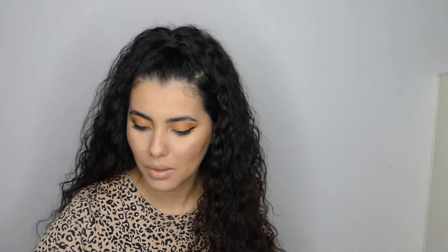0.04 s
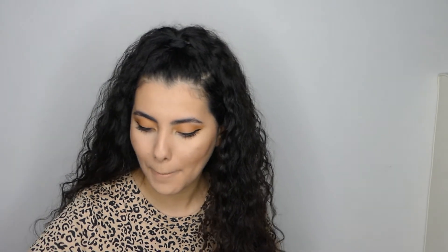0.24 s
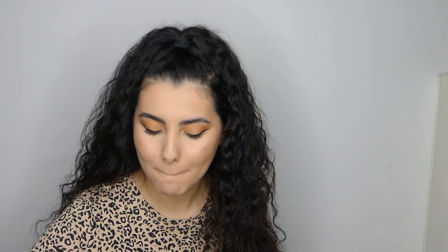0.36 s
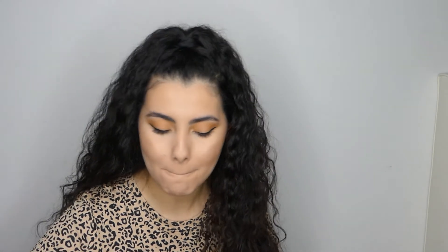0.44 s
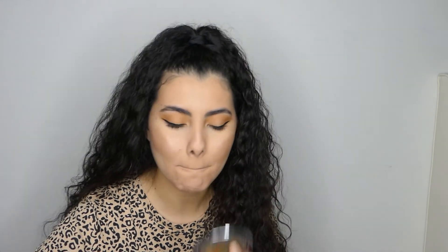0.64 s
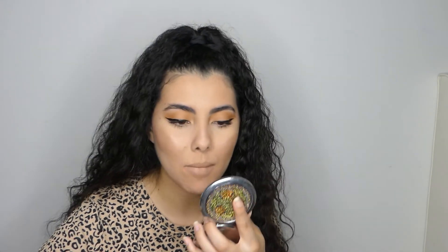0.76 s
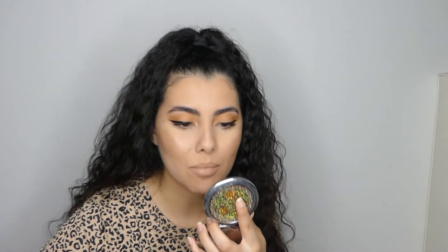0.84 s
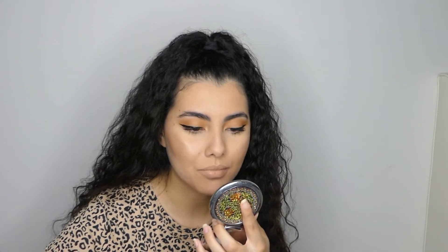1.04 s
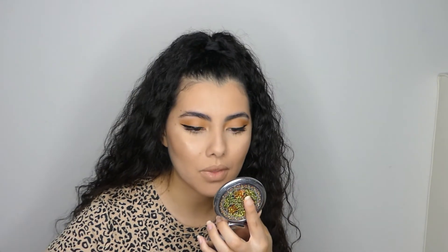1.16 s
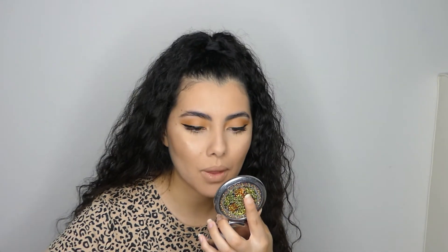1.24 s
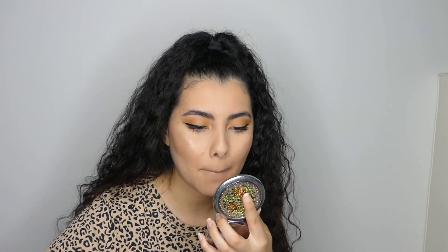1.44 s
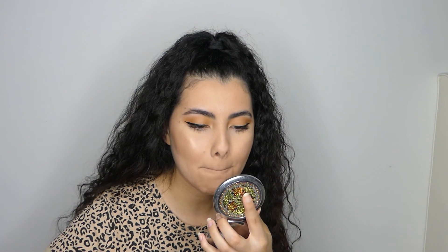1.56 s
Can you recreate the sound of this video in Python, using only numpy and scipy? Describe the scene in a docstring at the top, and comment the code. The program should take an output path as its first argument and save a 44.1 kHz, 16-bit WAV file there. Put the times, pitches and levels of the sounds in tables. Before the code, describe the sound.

A compact mirror clatters briefly among makeup items on a table, then clicks lightly.

```python
"""In a small, bare room, a compact mirror is picked up among makeup items on a table.
Things knock and rattle: each impact cracks at the contact and excites the damped modes of case, table
top and frame. Fingers slide on the case with grainy friction noise; it ticks faintly, bumps with a
hollow ring, and its lid clicks twice. A close stereo microphone hears the direct sound, the
reflections and reverberation of the walls, and a quiet room tone."""
import sys
import numpy as np
from scipy import signal
from scipy.fft import rfft, irfft
from scipy.io import wavfile

SR = 44100
rng = np.random.default_rng(int(sys.argv[2]) if len(sys.argv) > 2 else 0)


def int16_out(signal):
    """Quantize to a 16-bit WAV file."""
    q = np.round(np.clip(np.atleast_2d(signal).T, -1, 1) * 32767)
    wavfile.write(sys.argv[1], SR, q.astype(np.int16))


N = 70560


def undb(db):
    """The decibel scale: 20 dB is a factor of ten in amplitude."""
    return 10 ** (np.asarray(db) / 20)


def clock():
    """Uniform sampling: the time of every sample, in seconds."""
    return np.arange(N) / SR


def unit(x):
    """Normalisation to an energy of one."""
    return x / np.sqrt(np.sum(x ** 2))


def pan(db):
    """Intensity stereo: left and right gains for a level difference."""
    return undb(np.array([[db], [-db]]) / 2)


def along(points, hz):
    """Interpolation of (frequency [Hz], value) points on a log-frequency axis."""
    p = np.array(points, float)
    return np.interp(np.log(np.maximum(hz, 1)), np.log(p[:, 0]), p[:, 1])


def colour(x, points):
    """Minimum-phase filtering through (frequency [Hz], gain [dB]) points."""
    size = 2 * N
    gain = undb(along(points, np.fft.rfftfreq(size, 1 / SR)))
    cepstrum = irfft(np.log(gain))
    cepstrum[1:N] *= 2  # folding onto positive time makes the filter causal
    cepstrum[N + 1:] = 0
    return irfft(rfft(x, size) * np.exp(rfft(cepstrum)))[:N]


def hardness(x, treble_db):
    """Treble shelving: hard contacts are brighter than soft ones."""
    return colour(x, [(2900, 0), (5800, treble_db)])


def strike(x, at_s, db):
    """Transient level: a response starts at at_s, its level being its energy spread over 10 ms."""
    delayed = np.pad(unit(x), (int(at_s * SR), 0))[:N]
    return delayed * undb(db) * np.sqrt(SR / 100)


def ring(modes, detune, rise_s, tilt_db):
    """Modal superposition: damped sines, tilted by tilt_db per octave and detuned anew by each blow."""
    t, out = clock()[:N // 2], 0
    for hz, db, t60 in modes:
        tuned_hz = hz * (1 + detune * rng.standard_normal())
        decay = np.exp(-np.log(1000) * t / t60)
        out = out + undb(db + tilt_db * np.log2(hz)) * np.sin(2 * np.pi * tuned_hz * t) * decay
    return np.pad(out * (1 - np.exp(-t / rise_s)), (0, N - len(t)))


def contact(spectrum, chatter, decay_s):
    """Impulsive excitation: one push and a few milliseconds of chatter, shaped by a spectrum."""
    force = chatter * unit(rng.standard_normal(N) * np.exp(-clock() / decay_s))
    force[0] += 1
    return colour(force, spectrum)


# spectrum of the room tone (frequency [Hz], relative level [dB])
TONE_SPECTRUM = [(25, -11), (60, -0.5), (100, -6), (140, -0.5), (300, -2), (440, -2), (650, -11),
                 (1200, -12), (2200, -19), (5000, -20), (7700, -20.5), (10000, -18.5), (15000, -24.5)]
# its side signal against its mid signal (frequency [Hz], gain [dB])
TONE_WIDTH = [(30, 13), (150, 5.5), (400, 7), (1500, 6.5), (5000, -2.5), (15000, -5)]
# hum in the room (frequency [Hz], level [dB])
HUM_PARTIALS = [(177, -72.5), (298, -67)]
def room_tone():
    """Background noise: a low murmur and even hiss, partly correlated in stereo, with a weak hum."""
    mid, side = (unit(colour(rng.standard_normal(N), TONE_SPECTRUM)) * np.sqrt(N) for _ in range(2))
    murmur = mid + np.array([[1], [-1]]) * colour(side, TONE_WIDTH)
    hum = sum(undb(db) * np.sqrt(2) * np.sin(2 * np.pi * (hz * clock() + rng.random()))
              for hz, db in HUM_PARTIALS)
    return undb(-58) * murmur + hum


# sliding contacts (peak time [s], rise [s], fall [s], level [dB], treble [dB])
SLIDE_STROKES = [(0.150, 0.037, 0.02, -63.5, -15), (0.229, 0.0014, 0.048, -41, 2.5),
                 (0.283, .018, 0.035, -41.5, 4), (0.382, .015, 0.016, -43.5, 1),
                 (0.413, 0.017, 0.0092, -46, -5.5), (0.504, 0.0027, 0.021, -51.5, -12.5),
                 (0.698, 0.048, 0.023, -52, 2), (1.150, .15, 0.087, -66, -9.5),
                 (1.515, 0.016, 0.025, -64.5, -9)]
# spectrum of the friction (frequency [Hz], relative level [dB])
FRICTION_SPECTRUM = [(150, -6.5), (600, 0), (1500, -0.5), (3000, -3.5), (5500, 0.5), (7500, -6.5),
                     (9500, -7.5), (15000, -14.5)]
def slides():
    """Sliding friction: noise in grains of random strength swells and fades with each stroke."""
    t, out = clock(), 0
    grain_samples, grain_db = 32, 3
    for at, rise, fall, db, treble_db in SLIDE_STROKES:
        strengths = rng.exponential(size=N // grain_samples + 1).clip(0, 4)
        grains = undb(grain_db * np.repeat(strengths, grain_samples)[:N])
        friction = hardness(colour(rng.standard_normal(N) * grains, FRICTION_SPECTRUM), treble_db)
        swell = np.exp(-np.maximum((at - t) / rise, (t - at) / fall))
        out = out + unit(friction) * np.sqrt(N) * undb(db) * swell
    return out


# knocks on the table (time [s], frame thump [dB], table thud [dB], case ring [dB], crack [dB],
# crack treble [dB], left minus right [dB])
TABLE_KNOCKS = [(0.2055, -72, -50, -59, -65, -6, 3), (0.2268, -34.5, -26.5, -41, -35.5, -2.5, 2),
                (0.2590, -36, -24, -23, -22.5, -4, 0.5), (0.2606, -59, -25, -31, -24, -11, 3),
                (0.2672, -37, -54, -30.5, -28.5, 8, 2.5), (0.2929, -39, -34, -36, -35.5, -2, -2),
                (0.3112, -41, -24, -45, -41, 11.5, 0), (0.3375, -50, -34, -46, -33, -5, 2),
                (0.3752, -56, -28, -36, -26.5, -11, 1.5), (0.3970, -52.5, -42, -49, -41.5, -8, -8),
                (0.4110, -62, -35.5, -44.5, -39, 0, 4.5), (0.4335, -75, -58, -55, -40.5, -4, 0),
                (0.4490, -76, -62, -57, -47.5, -10, 0)]
# modes of the table frame, the table top (its first two heavily damped) and the plastic case
# (frequency [Hz], relative level [dB], T60 [s])
FRAME_MODES = [(135.5, -3, 0.35), (172, -6, 0.12), (202.5, 3.5, 0.043)]
TOP_MODES = [(300, -3, 0.059), (461, 2.5, 0.041), (244, -13, 0.19), (380, -27, 0.11), (395, -12.5, .15),
             (409, -6.5, 0.21), (446, -1.5, 0.22), (502, -1, 0.11), (648, -5, 0.17)]
CASE_MODES = [(860, -6, 0.32), (871, 3.5, 0.15), (1114, -0.5, 0.19), (1255, -9, 0.13), (1313, -6.5, 0.15),
              (1574, 0, 0.18), (1630, -4, 0.19), (1839, -1, 0.059), (2410, 0.5, 0.11), (2519, -6.5, 0.24),
              (2937, -6, 0.17), (4138, -7.5, 0.17), (4540, -0.5, 0.047)]
# spectrum of a hard contact (frequency [Hz], relative level [dB])
CRACK_SPECTRUM = [(90, -38), (300, 0), (520, 6.5), (720, -1), (880, 8.5), (1020, -1.5), (1650, 3.5),
                  (2150, 0.5), (2450, 1.5), (3400, -5), (4400, -8.5), (7500, -26), (9000, -27.5),
                  (15000, -46)]
def knocks():
    """Free vibration after impact: frame, top and case ring; the contact cracks. Returns rings, cracks."""
    rings, cracks = 0, 0
    for at, thump_db, thud_db, ring_db, crack_db, treble_db, pan_db in TABLE_KNOCKS:
        thump = strike(ring(FRAME_MODES, detune=0.0037, rise_s=0.006, tilt_db=8), at, thump_db)
        thud = strike(ring(TOP_MODES, detune=0.014, rise_s=0.00017, tilt_db=1.5), at, thud_db)
        case = strike(ring(CASE_MODES, detune=0.002, rise_s=0.0012, tilt_db=-1), at, ring_db)
        crack = hardness(contact(CRACK_SPECTRUM, chatter=1.7, decay_s=0.0054), treble_db)
        rings = rings + pan(pan_db) * (thump + thud + case)
        cracks = cracks + pan(pan_db) * strike(crack, at, crack_db)
    return rings, cracks


# faint ticks of the held case (time [s], level [dB], tilt [dB/octave])
CASE_TICKS = [(0.529, -50.5, 4), (0.647, -50, -4), (1.007, -55.5, 1), (1.090, -60.5, -18),
              (1.117, -54.5, 4), (1.2469, -54, 5), (1.565, -54, 5)]
# modes of a tick (frequency [Hz], relative level [dB], T60 [s])
TICK_MODES = [(866, 6, 0.02), (1243, 2, 0.024), (1912, -12, 0.034), (3200, -13, 0.011)]
def case_ticks():
    """Heavy damping: modes under the fingers die so quickly that they are heard as soft ticks."""
    return sum(strike(ring(TICK_MODES, detune=0.02, rise_s=0.003, tilt_db=tilt), at, db)
               for at, db, tilt in CASE_TICKS)


# bumps of the case in the hand (time [s], level [dB])
CASE_BUMPS = [(0.6900, -51.5), (0.6928, -44), (0.6972, -39.5), (0.7085, -53.5)]
# spectrum of a dull bump (frequency [Hz], relative level [dB])
BUMP_SPECTRUM = [(70, -7), (130, -1), (270, 2), (600, 0.5), (770, -2.5), (920, -10), (1150, -12.5),
                 (1800, -7), (3500, -15.5), (5200, -19), (7500, -34), (9500, -25), (15000, -38)]
# hollow modes of the case in the hand (frequency [Hz], relative level [dB], T60 [s])
HOLLOW_MODES = [(261.6, -4.5, 0.11), (395, -1.5, 0.14), (498, -2, 0.11), (653, 1.5, 0.082),
                (929, -2.5, 0.06)]
def case_bumps():
    """Resonance: each dull contact with the hand sets off a weaker, hollow ring of the case."""
    out = 0
    for at, db in CASE_BUMPS:
        bump = contact(BUMP_SPECTRUM, chatter=1.75, decay_s=0.006)
        hollow = ring(HOLLOW_MODES, detune=0.005, rise_s=0.0015, tilt_db=0.5)
        out = out + strike(bump, at, db) + strike(hollow, at, db - 4.5)
    return pan(db=2.7) * out


# clicks of the lid (time [s], level [dB], treble [dB])
LID_CLICKS = [(0.8184, -41, -1), (0.9537, -49, -4.5)]
# spectrum of a click (frequency [Hz], relative level [dB])
CLICK_SPECTRUM = [(70, -44), (300, -14), (750, -6), (1050, -5), (1340, 5), (1600, 3), (2050, 0),
                  (2450, -11.5), (2950, -6), (3500, -14), (4200, -12), (5500, -15), (7000, -22.5),
                  (15000, -29)]
def lid_clicks():
    """A brief impulse has a broad spectrum: the lid clicks sharply, with little chatter."""
    out = 0
    for at, db, treble_db in LID_CLICKS:
        click = contact(CLICK_SPECTRUM, chatter=0.65, decay_s=0.005)
        out = out + strike(hardness(click, treble_db), at, db)
    return pan(db=0.5) * out


# reverberation time of the room (frequency [Hz], T60 [s])
REVERB_TIMES = [(125, 0.52), (250, 0.43), (500, 0.36), (1500, 0.24), (4000, 0.34), (12000, 0.29)]
def tail(onset_s=0.0071):
    """Diffuse reverberation: noise decays exponentially, each octave at its own rate."""
    t, hz = clock(), np.fft.rfftfreq(N, 1 / SR)
    noise, out = rfft(rng.standard_normal(N)), 0
    for centre in 125 * 2 ** np.arange(8):
        octave = np.clip(1 - abs(np.log2((hz + 1) / centre)), 0, 1)
        decay = np.exp(-np.log(1000) * t / along(REVERB_TIMES, centre))
        out = out + irfft(noise * octave, N) * decay
    return unit(out * np.clip(t / onset_s - 1, 0, 1))


# side against mid signal of the reverberation (frequency [Hz], gain [dB])
REVERB_WIDTH = [(100, -14), (300, -12.5), (700, -8), (2000, -8), (5000, -10.5), (12000, -3)]
# first reflections (delay [s], relative level [dB], left minus right [dB])
REFLECTIONS = [(0.0042, -17, 22.5), (0.0080, -11, 9.5), (0.0115, -13.5, -15)]
def room(x, wet_db, echo_db):
    """Convolution with the room's impulse response: direct sound, first reflections and diffuse tail."""
    diffuse = tail() + np.array([[1], [-1]]) * colour(tail(), REVERB_WIDTH)
    response = diffuse * undb(wet_db) * pan(db=-0.5)
    response[:, 0] += 1  # direct sound
    for delay, db, pan_db in REFLECTIONS:
        response[:, int(delay * SR)] += undb(db + echo_db) * pan(pan_db)[:, 0]
    return signal.fftconvolve(x * np.ones((2, 1)), response, axes=1)[:, :N]


def scene():
    """Superposition: table and hand sounds, each with its share of reflections, add to the room tone."""
    rings, cracks = knocks()
    return (room(rings, wet_db=-12.5, echo_db=-3)
            + room(cracks + slides(), wet_db=0, echo_db=-2)
            + room(case_ticks(), wet_db=-7.5, echo_db=-12)
            + room(case_bumps(), wet_db=-4, echo_db=-5)
            + room(lid_clicks(), wet_db=1, echo_db=2)
            + room_tone())


def record(dry):
    """Band limiting: the microphone sheds the deep bass and the recorder cuts the top."""
    bass_hz, top_hz = 100, 15600
    x = signal.sosfilt(signal.butter(3, bass_hz, "high", fs=SR, output="sos"), dry)
    return signal.sosfilt(signal.ellip(10, .2, 80, top_hz, fs=SR, output="sos"), x)


dry = scene()
out = record(dry)
int16_out(out)
```